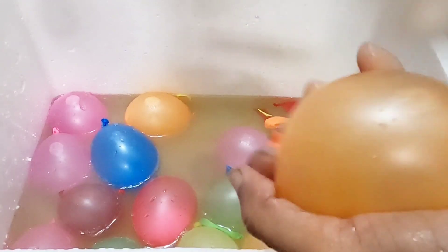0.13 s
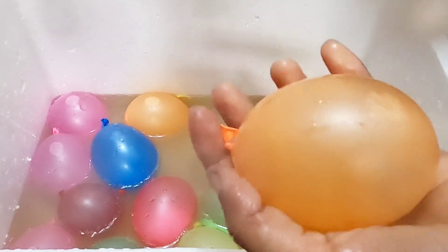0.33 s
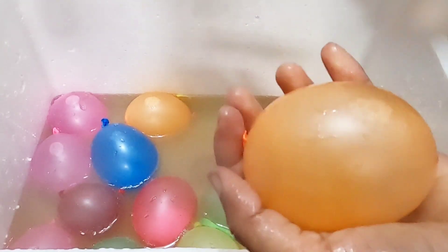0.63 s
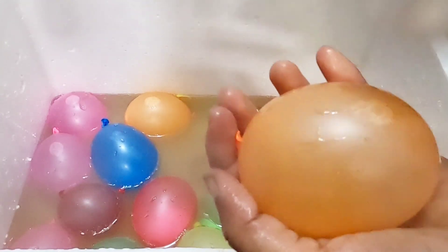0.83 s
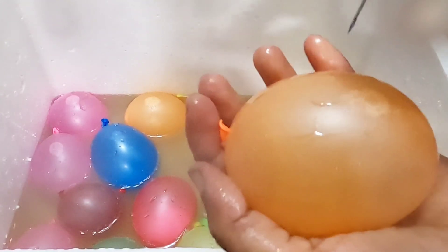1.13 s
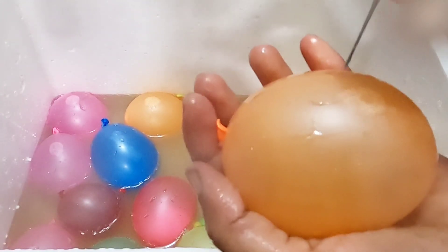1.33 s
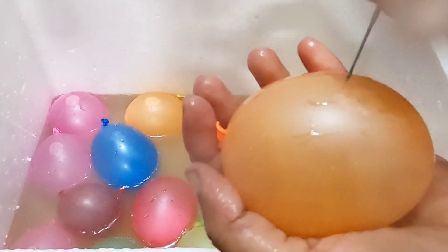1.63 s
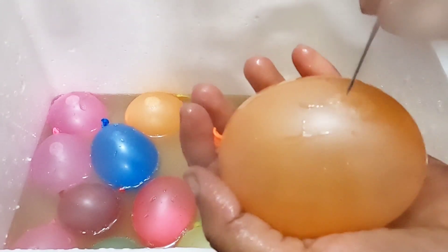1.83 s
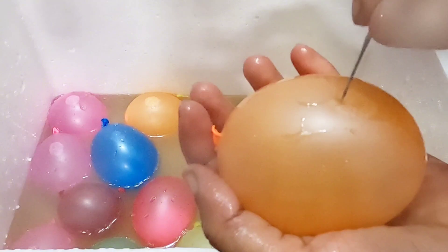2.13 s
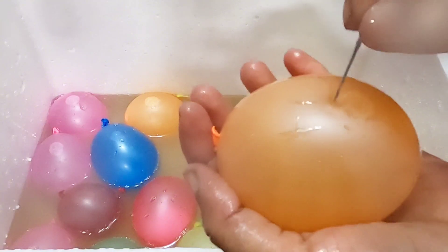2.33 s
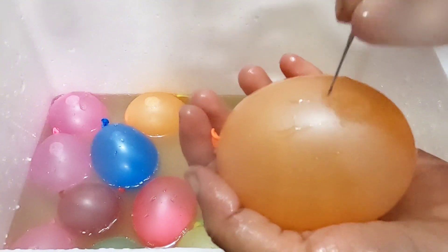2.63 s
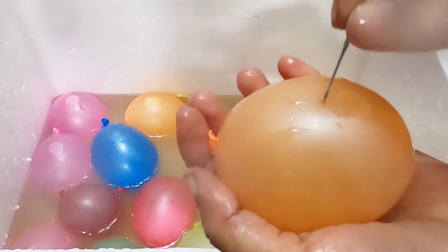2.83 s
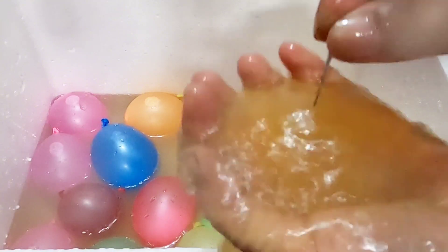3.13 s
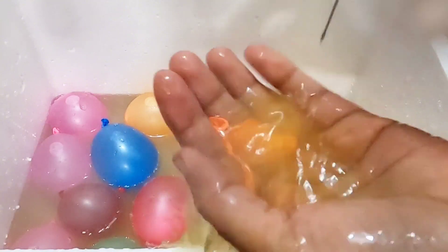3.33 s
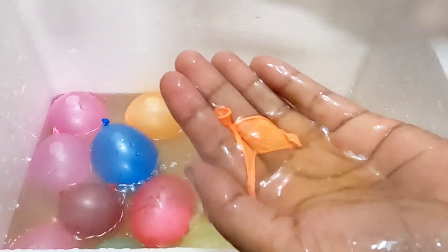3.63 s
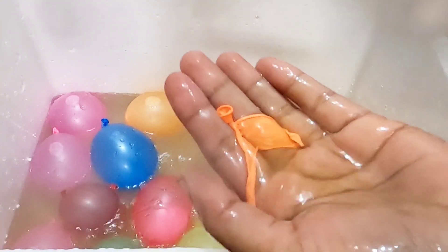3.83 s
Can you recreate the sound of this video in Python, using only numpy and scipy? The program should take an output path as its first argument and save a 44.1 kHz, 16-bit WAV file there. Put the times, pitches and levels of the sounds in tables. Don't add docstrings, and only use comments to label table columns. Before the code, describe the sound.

Close up in a small humming room, a water balloon trickles briefly, goes quiet with faint skin ticks, then bursts with a bright snap, followed by a short hiss and bubbly splashing into a tub.

```python
import sys
import numpy as np
from scipy import signal
from scipy.fft import rfft, irfft, next_fast_len
from scipy.io import wavfile
from scipy.ndimage import uniform_filter1d, map_coordinates

SR = 44100
rng = np.random.default_rng(int(sys.argv[2]) if len(sys.argv) > 2 else 0)


def how_loud(loudness_db):
    steps = np.asarray(loudness_db, float) / 20
    return 10 ** steps


def dump(signal):
    limited = np.clip(np.atleast_2d(signal).T, -1, 1)
    pcm = np.round(limited * 32767).astype(np.int16)
    wavfile.write(sys.argv[1], SR, pcm)


N = 176400

# f/Hz, width/Hz, level/dB
ROOM_MODES = [(19.4, 3.5, -2.5), (52.2, 13, -23), (102, 35, -19), (131, 9, -12), (145, 11, -16.5),
              (200, 18, -14), (250.4, 11, -16), (284.3, 9, -17.5), (382, 4.6, -16.5)]
HUM_DB, HUM_FOLLOWS = -6, 0.21
# t/s, level/dB
DRONE_STRENGTH = [(0, -31.5), (.12, -39), (.3, -39.5), (.55, -34), (.8, -48.5), (1, -38.5), (1.13, -46.5),
                  (1.28, -37.5), (1.5, -41), (1.63, -40), (2.12, -42.5), (2.28, -33), (2.7, -44),
                  (2.9, -36), (3.3, -40), (4, -36)]
# f/Hz, level/dB
DRONE_LINES = [(159, -1), (182.5, -6), (87.8, -14.5), (236, -22)]
DRIFT_RAD, SWAY_DB = 0.84, 4
# f/Hz, density/dB per Hz
AIR_SPECTRUM = [(160, -32), (280, -8), (700, -23.5), (1230, -22.5), (2280, -30.5), (3900, -32), (7200, -27),
                (15500, -46.5)]
AIR_DB = -69
# f/Hz, correlation/1
WATER_ALIKE = [(60, 1), (380, 0.93), (2380, 0.64), (10000, 0.81), (14000, 0.17)]
# f/Hz, correlation/1
ROOM_ALIKE = [(70, 1), (130, 0.95), (300, 0.87), (900, 0.36)]
# t/s, length/s, f/Hz, glide/Hz per s, level/dB
SQUEAKS = [(0.085, .065, 1030, 0, -51), (.08, .05, 1650, 0, -55), (.064, .02, 2430, 0, -52),
           (0.26, 0.064, 4330, 0, -55), (0.335, 0.05, 3170, 2000, -52), (.34, .1, 1100, 0, -61),
           (.33, .09, 2040, 0, -61), (.34, .1, 4460, 0, -61), (.42, .12, 3200, 0, -64),
           (.65, .3, 2400, 0, -78), (.92, .48, 2480, 60, -79), (1.19, 0.28, 2170, 200, -78),
           (1.29, .14, 2670, 0, -81), (1.57, .13, 3180, 0, -82), (2.208, 0.14, 2420, 300, -80),
           (3.08, 0.22, 2620, 1200, -77)]
# t/s, length/s, f/Hz, level/dB
RUBS = [
    (0.736, 0.28, 6200, -69),
    (1.917, 0.22, 6460, -75),
    (1.95, 0.19, 1050, -74.5),
    (2.251, 0.21, 902, -73.5),
    (3.12, .12, 3800, -83),
]
SQUEAK_WIDTH, RUB_WIDTH = 0.065, 0.8

# t/s, level/dB
RUNOFF_LEVEL = [
    (0, -49.5),
    (.04, -56),
    (.075, -44.5),
    (.19, -56),
    (.29, -48.5),
    (.42, -60),
    (.58, -72),
    (.8, -75),
]
# f/Hz, density/dB per Hz
RUNOFF_SPECTRUM = [(180, -24), (300, -14.5), (366, -14), (4350, -17), (12300, -33.5), (15500, -44.5)]
# f/Hz, width/Hz, level/dB
CAVITY_MODES = [(380, 68, 2.5), (1050, 81, 1.5), (2000, 280, -12.5), (3130, 77, -26.5), (4700, 130, -24.5)]
# t/s, peak level/dB, centre f/Hz
DROPS = [(0.055, -30, 1730), (0.06, -36, 2500), (0.309, -28.5, 3180), (1.884, -51, 2170),
         (3.397, -25, 6340), (3.429, -19, 6700), (3.443, -12.5, 4400), (3.456, -14.5, 7370),
         (3.471, -8.5, 5000), (3.502, -11, 4000), (3.519, -15.5, 4640), (3.571, -17, 4700),
         (3.64, -21, 8000), (3.657, -15, 5000), (3.731, -16, 5850), (3.781, -21, 6800), (3.8215, -21, 6900),
         (3.829, -13, 4160), (3.87, -17.5, 2780), (3.903, -26.5, 9000)]
DROP_T60_S, DROP_RISE_S = 0.024, 0.0025
# t/s, peak level/dB
TICKS = [(0.4446, -54), (0.4638, -49), (0.9542, -51.5), (1.1694, -53.5), (1.255, -53.5), (1.2908, -54.5),
         (1.8023, -50), (1.8142, -53), (2.269, -59), (2.487, -61.5), (2.711, -53), (2.726, -56),
         (2.8664, -59.5), (2.9716, -59)]
TICK_T60_S, TEAR_RISE_S = 0.015, 0.00015

# start t/s, end t/s, f/Hz, level/dB
PINHOLE = (3.155, 3.187, 7800, -45)
# t/s, f/Hz, level/dB, life/cycles
WHIP = [
    (3.1677, 3600, -30, 9),
    (3.1677, 5000, -33, 12),
    (3.1785, 3500, -27, 10),
    (3.1785, 5000, -31, 12),
    (3.1892, 3400, 2, 10),
    (3.1892, 4900, -2, 13),
    (3.189, 7750, -6, 20),
    (3.188, 10100, -10, 26),
]
# t/s, peak level/dB, centre f/Hz, t60/s
TEAR = [
    (3.187, -10, 7450, 0.011),
    (3.191, -20, 7500, 0.019),
    (3.2488, -22.5, 5200, 0.033),
]
# t/s, level/dB
SPRAY_LEVEL = [
    (3.195, -43.5),
    (3.23, -38),
    (3.26, -31),
    (3.35, -38.5),
    (3.41, -39),
]
# f/Hz, density/dB per Hz
SPRAY_SPECTRUM = [(180, -16), (300, 5.5), (632, -9.5), (972, 1), (1880, -1.5), (7200, -5), (12200, -25.5),
                  (15700, -20)]

# t/s, splash level/dB, push on the tub level/dB
FALL_LEVELS = [
    (3.4, -35, -32.5),
    (3.46, -24.5, -22.5),
    (3.52, -25.5, -22.5),
    (3.6, -25.5, -34),
    (3.68, -26.5, -24),
    (3.78, -30.5, -35),
    (3.845, -31, -30.5),
    (3.9, -32, -36.5),
    (4, -40.5, -54),
]
# f/Hz, density/dB per Hz
SPLASH_SPECTRUM = [(180, -35), (300, 2), (700, -12.5), (1000, -3), (4490, -6.5), (12300, -24.5),
                   (14300, -36), (15500, -56.5)]
DULL_HZ, FOAM_HZ = 3000, 9000
# f/Hz, width/Hz, level/dB
TUB_MODES = [(71, 20.3, -5.5), (162, 13.6, -1.5), (203, 38, -15), (242, 11, -5.5), (276, 5.4, -7),
             (383, 11, -15.5), (560, 58, -19)]
# t/s, f/Hz, level/dB
BUBBLES = [(3.405, 1230, -17), (3.413, 1700, -10), (3.42, 2217, -7), (3.431, 3370, -12),
           (3.432, 3000, -3.5), (3.448, 2290, -9.5), (3.476, 2570, -7.5), (3.499, 3220, -18),
           (3.51, 1255, -15), (3.519, 2000, -10), (3.521, 4210, -9.5), (3.543, 2690, -11),
           (3.569, 4320, -24), (3.583, 1477, -13.5), (3.586, 2720, -9.5), (3.588, 2094, -8),
           (3.593, 1600, -9), (3.594, 990, -9), (3.601, 2730, -10.5), (3.61, 1355, -15),
           (3.629, 1826, -11.5), (3.647, 1450, -9.5), (3.655, 1200, -10), (3.668, 1074, -12.5),
           (3.674, 1700, -15), (3.753, 896, -16), (3.782, 2360, -16.5), (3.794, 4300, -13),
           (3.81, 2940, -20), (3.824, 3900, -17), (3.83, 2780, -20), (3.838, 995, -8.5),
           (3.845, 995, -14.5), (3.84, 384, -17), (3.84, 615, -14.5), (3.869, 832, -13.5), (3.74, 560, -21),
           (3.88, 631, -13), (3.895, 922, -13)]
RISE, LIFE_S = 0.13, 0.0087
# t/s, f/Hz, level/dB
GULPS = [
    (3.451, 71.5, -17.5),
    (3.5, 72.1, -18.5),
    (3.661, 72.3, -23.5),
    (3.84, 76.4, -23),
]
GULP_S = 0.027
PUFF_S, PUFF_DB, PUFF_HZ = 3.8, -19.5, 49

# f/Hz, t60/s
ROOM_DECAY = [(200, 0.084), (2000, 0.43), (10000, 0.63)]
ROOM_DB = -2
MIC_HZ, PORT_HZ, PORT_GAIN, TOP_HZ = 12900, 12430, 0.48, 15800
TOP_LEFT_DB, BASS_LEFT_DB = 6.5, -1.5


def unit(x):
    return x / np.sqrt(np.mean(x ** 2) + 1e-20)


def along(points, hz):
    f, v = np.transpose(points)
    return np.interp(np.log(hz + 1), np.log(f + 1), v)


def colour(points):
    return lambda hz: how_loud(along(points, hz))


def curves(rows):
    s, *columns = np.transpose(rows)
    t = np.arange(N) / SR
    gains = []
    for db in columns:
        after_db = -140 if s[-1] < 3.9 else db[-1]
        gains.append(uniform_filter1d(how_loud(np.interp(t, s, db, -140, after_db)), size=180))
    return gains


def wobble(rate):
    knots = rng.standard_normal(int(N * 60 / SR) + 4)
    return map_coordinates(knots, [np.minimum(rate, 60) * np.arange(N) / SR])


def filtered(x, response):
    m = next_fast_len(N + SR // 2)
    return irfft(rfft(x, m) * response(np.fft.rfftfreq(m, 1 / SR)), m)[..., :N]


def modes(table):
    def response(f):
        total = 0
        for k, (centre, width, db) in enumerate(table):
            loss = 1j * f * width
            total = total + (-1) ** k * how_loud(db) * loss / (centre * centre - f * f + loss)
        return total
    return response


def rush(gain, alike, patchy_db):
    z = signal.stft(rng.standard_normal((2, N)), nperseg=256)[2]
    field = uniform_filter1d(rng.standard_normal(z.shape[1:]), size=5, axis=0)
    field = uniform_filter1d(field, size=3, axis=1)
    pair = signal.istft(z * how_loud(patchy_db * unit(field)), nperseg=256)[1][:, :N]

    def mid_side(hz):
        turn = np.arccos(np.clip(along(alike, hz), -1, 1)) / 2
        return gain(hz) * [np.cos(turn), np.sin(turn)]
    mid, side = filtered(pair, mid_side)
    return unit(np.array([mid + side, mid - side]))


def ring(s, hz, db, cycles, pan_db):
    t = np.arange(2200) / SR
    u = t * (hz / cycles)[:, None]
    swell = 22 * u * u * np.exp(-6.5 * u)
    wave = how_loud(db)[:, None] * swell * np.sin(2 * np.pi * cycles[:, None] * (u + RISE * u * u / 2))
    at = (np.round(s * SR).astype(int)[:, None] + np.arange(len(t))).ravel()
    sides = [(wave * how_loud(side * pan_db)[:, None]).ravel() for side in (.5, -.5)]
    return np.array([np.bincount(at, side, N + SR)[:N] for side in sides])


def swarm(t0, t1, count, centre_hz, spread, cycles, size_db):
    r, e = rng.standard_normal((count, 2)), rng.random((count, 2))
    s = t0 + (t1 - t0) * e[:, 0]
    hz = np.clip(centre_hz * np.exp(spread * r[:, 0]), 300, 14000)
    db = -size_db * np.log(e[:, 1] + 0.02)
    x = ring(s, hz, db, np.full(count, 1. * cycles), 1.5 + 3 * r[:, 1])
    return unit(x) * np.sqrt((t1 - t0) * SR / N)


def bursts(rows):
    out, t = np.zeros((2, N + SR)), np.arange(2000) / SR
    for s, db, hz, t60, rise in rows:
        band = [hz * .5 / SR * 2, min(hz * 1.443, 12500) / SR * 2]
        b, a = signal.butter(2, band, "band")
        n = rng.standard_normal((3, len(t)))
        burst = unit(signal.lfilter(b, a, n[0] + 0.24 * n[1:]))
        envelope = how_loud(db - 0.5 - 60 * t / t60) * (1 - np.exp(-t / rise))
        out[:, round(s * SR):][:, :len(t)] += envelope * burst
    return out[:, :N]


def room_tone():
    t, (strength,) = np.arange(N) / SR, curves(DRONE_STRENGTH)

    def hum_gain(f):
        power = sum(abs(modes([m])(f)) ** 2 for m in ROOM_MODES)
        return power ** 0.8 / (1 + (f / 260) ** 4)
    swell = strength ** HUM_FOLLOWS * strength.mean() ** (1 - HUM_FOLLOWS)
    hum = how_loud(HUM_DB) * swell * rush(hum_gain, ROOM_ALIKE, patchy_db=-2)
    drone = np.zeros(N)
    for hz, db in DRONE_LINES:
        level = np.sqrt(2) * how_loud(db + SWAY_DB * wobble(11))
        drone += strength * level * np.sin(2 * np.pi * hz * t + DRIFT_RAD * wobble(17))
    stir_db = 1.02 * sum(np.exp(-((t - s) / 0.085) ** 2) for s, _ in TICKS)
    air_level = how_loud(AIR_DB + wobble(3) + wobble(25) + stir_db)
    return hum + drone + air_level * rush(colour(AIR_SPECTRUM), ROOM_ALIKE, patchy_db=2.5)


def runoff():
    level, = curves(RUNOFF_LEVEL)
    gain = lambda f: colour(RUNOFF_SPECTRUM)(f) * (1.44 + abs(modes(CAVITY_MODES)(f)) ** 2)
    hiss = how_loud(-1.0) * rush(gain, WATER_ALIKE, patchy_db=1.0)
    drips = swarm(0, 0.94, count=500, centre_hz=2500, spread=0.68, cycles=9.7, size_db=4.0)
    return level * (hiss + how_loud(-7) * drips)


def drops():
    return bursts([(*row, DROP_T60_S, DROP_RISE_S) for row in DROPS])


def squeak(s, length, hz, glide, db, width):
    t = np.arange(int(.8 * SR)) / SR - .4
    n = rng.standard_normal((3, len(t))) + 1j * rng.standard_normal((3, len(t)))
    slow = signal.lfilter(*signal.butter(2, width * hz / SR), n[0] + .6 * n[1:])
    carrier = np.exp(2j * np.pi * (hz + glide * t / 2) * t)
    wave = unit((slow * carrier).real) * how_loud(db) * np.exp(-(t / (length / 2)) ** 4)
    out = np.zeros((2, N + 2 * SR))
    out[:, SR + round((s + t[0]) * SR):][:, :len(t)] = wave
    return out[:, SR:SR + N]


def rubber_friction():
    squeaks = sum(squeak(*row, SQUEAK_WIDTH) for row in SQUEAKS)
    return squeaks + sum(squeak(s, length, hz, 0, db, RUB_WIDTH) for s, length, hz, db in RUBS)


def skin_ticks():
    return bursts([(s, db - 4.0, 7000, TICK_T60_S, TEAR_RISE_S) for s, db in TICKS])


def pinhole_whistle():
    t = np.arange(N) / SR
    start, end, hz, db = PINHOLE
    level = how_loud(db - 900 * abs(end - t)) * ((t > start) & (t < end))
    return level * np.sin(2 * np.pi * hz * t)


def skin_whip():
    return ring(*np.transpose(WHIP), np.full(len(WHIP), .5))


def skin_tear():
    return bursts([(*row, TEAR_RISE_S) for row in TEAR])


def spray():
    level, = curves(SPRAY_LEVEL)
    mist = how_loud(-2.0) * rush(colour(SPRAY_SPECTRUM), WATER_ALIKE, patchy_db=3.5)
    droplets = swarm(3.19, 3.41, count=300, centre_hz=5800, spread=0.44, cycles=7.8, size_db=0.5)
    return level * (mist + how_loud(-9.5) * droplets)


def splash():
    level, push = curves(FALL_LEVELS)
    thin = np.clip((np.arange(N) / SR - 3.7) / 0.1, 0, 1)

    def thin_gain(f):
        return colour(SPLASH_SPECTRUM)(f) * (1.0 + abs(modes(CAVITY_MODES)(f))) / (1 + f / DULL_HZ)
    hiss = (1 - thin) * rush(colour(SPLASH_SPECTRUM), WATER_ALIKE, patchy_db=2.5)
    hiss = hiss + thin * rush(thin_gain, WATER_ALIKE, patchy_db=-3)
    hiss = how_loud(1.33 * wobble(45) + 1.1 * wobble(18)) * hiss * how_loud([[.7], [-.7]])
    large = swarm(3.4, 4, count=400, centre_hz=1700, spread=.6, cycles=16.3, size_db=4.0)
    small = swarm(3.4, 4, count=700, centre_hz=5000, spread=0.44, cycles=2.15, size_db=5.5)
    foam = filtered(how_loud(-7) * large + how_loud(-7.5) * small, lambda f: 1 / (1 + (f / FOAM_HZ) ** 4))
    drumming = how_loud(-4.0 + 2.1 * wobble(22)) * push
    tub = drumming * rush(modes(TUB_MODES), ROOM_ALIKE, patchy_db=-0.5) * how_loud([[-1.2], [1.2]])
    return level * (hiss + foam) + tub


def bubbles():
    s, hz, db = np.transpose(BUBBLES)
    return ring(s, hz, db, LIFE_S * hz + 3, 1.0 + 0 * s)


def gulps():
    out = np.zeros(N)
    for s, hz, db in GULPS:
        t = np.maximum(np.arange(N) / SR - s, 0)
        out += how_loud(db) * np.e * t / GULP_S * np.exp(-t / GULP_S) * np.sin(2 * np.pi * hz * t)
    return out


def collapse_puff():
    u = np.maximum(np.arange(N) / SR - PUFF_S, 0) * PUFF_HZ * 2 * np.pi
    return how_loud(PUFF_DB) * 3 * u * (1 - u / 2) * np.exp(-u)


def room(x):
    hz, t, z = signal.stft(rng.standard_normal((2, SR // 2)), SR, nperseg=256)
    decay = how_loud(-60 * t / along(ROOM_DECAY, hz)[:, None])
    tail = signal.istft(z * decay, SR, nperseg=256)[1]
    late = np.pad(x, (150, 0))[None]
    return signal.fftconvolve(late, tail / np.linalg.norm(tail[0]), axes=1)[:, :N]


def scene():
    near = drops() + skin_ticks() + pinhole_whistle() + skin_whip() + skin_tear()
    near = near + bubbles() + collapse_puff()
    water = runoff() + spray() + splash() + gulps()
    return near + how_loud(ROOM_DB) * room(near.mean(axis=0)) + water + room_tone() + rubber_friction()


def band_limit(x):
    return signal.sosfilt(signal.butter(12, 15800, fs=SR, output="sos"), x)


def record(dry):
    def mic(f):
        top_db = 2 * TOP_LEFT_DB / (1 + (PORT_HZ / (f + 1)) ** 8)
        bass_db = 2 * BASS_LEFT_DB / (1 + (f / 90) ** 8)
        lean = how_loud(np.outer([.5, -.5], top_db + bass_db))
        port = 1 + PORT_GAIN * np.exp(-((f - PORT_HZ) / 500) ** 2)
        return lean * (f < TOP_HZ) * port / np.sqrt(1 + (f / MIC_HZ) ** 14)
    return band_limit(filtered(dry, mic))


dry = scene()
out = record(dry)
dump(out)
```